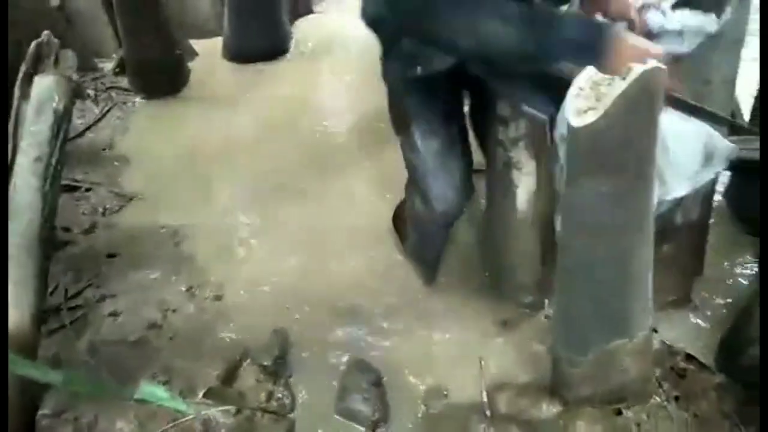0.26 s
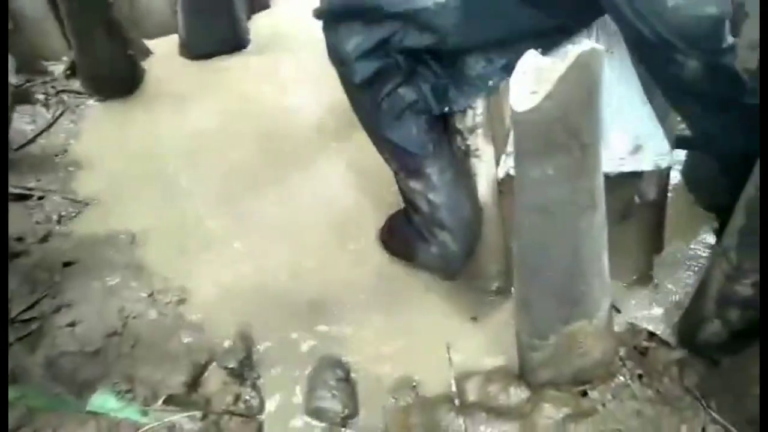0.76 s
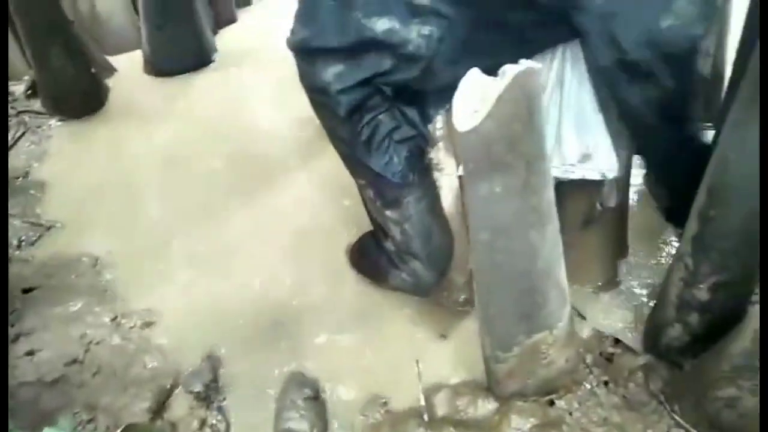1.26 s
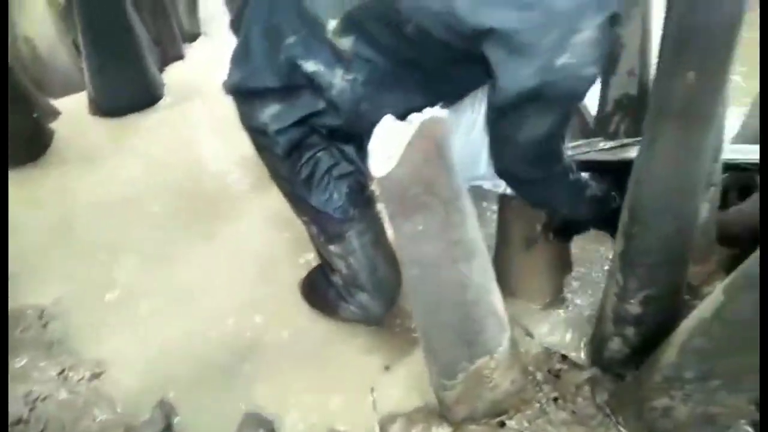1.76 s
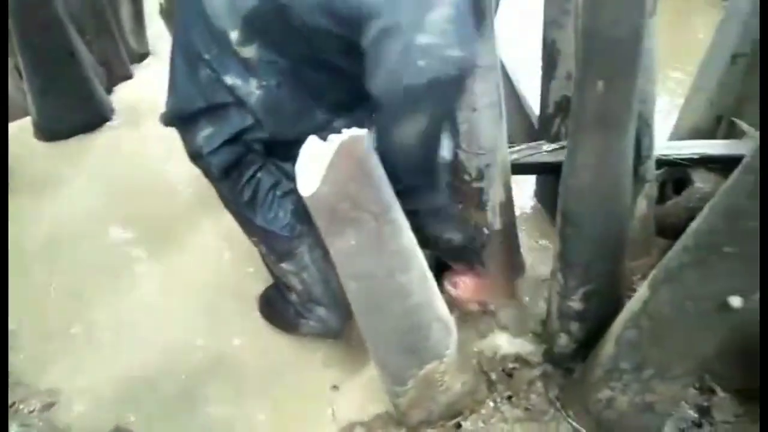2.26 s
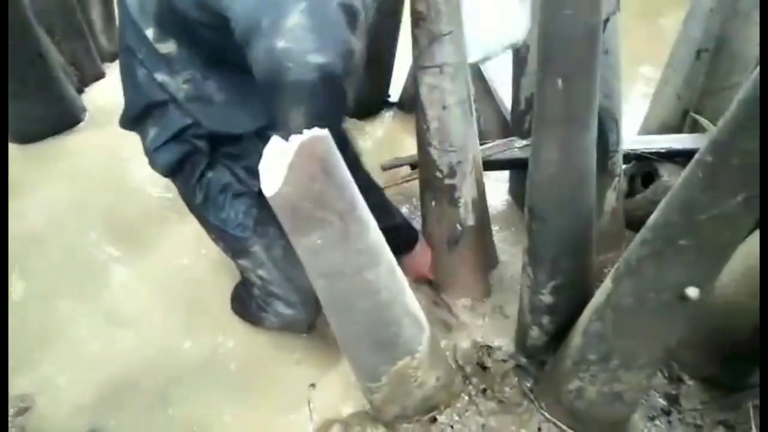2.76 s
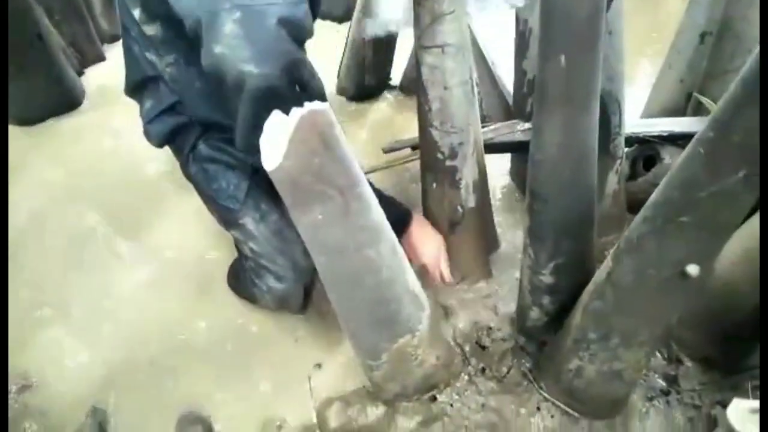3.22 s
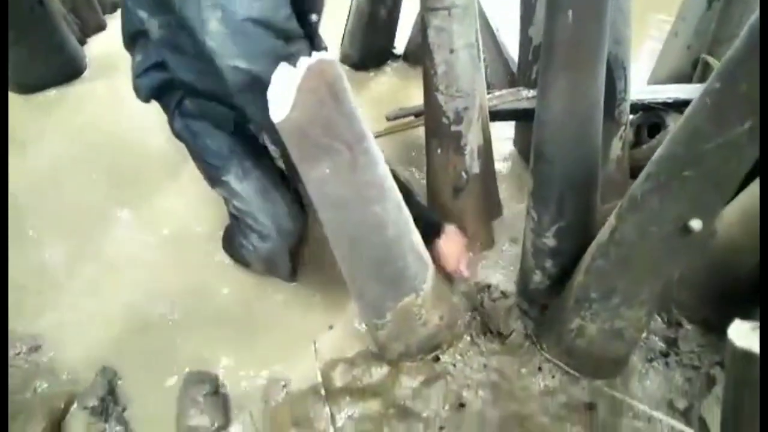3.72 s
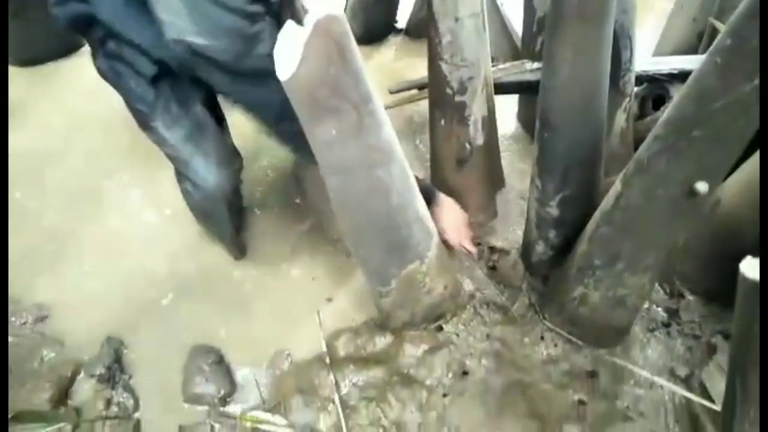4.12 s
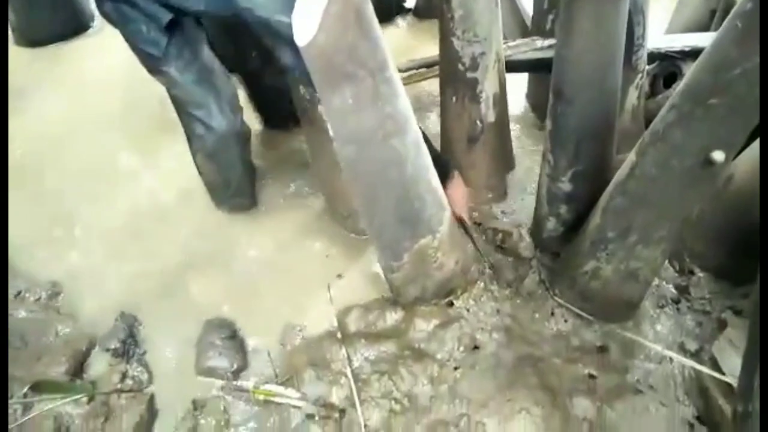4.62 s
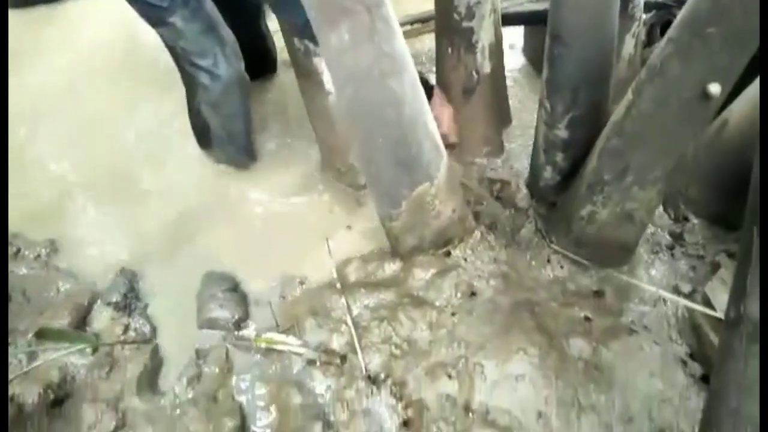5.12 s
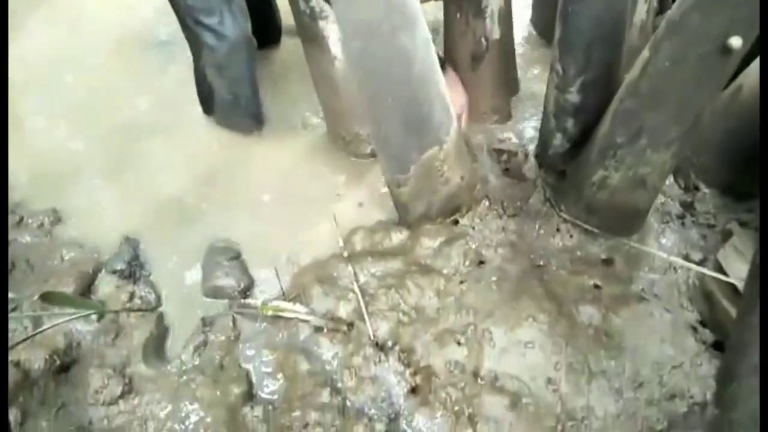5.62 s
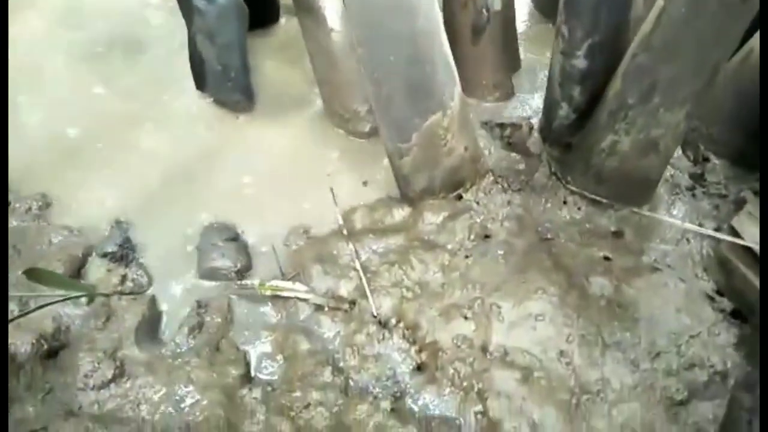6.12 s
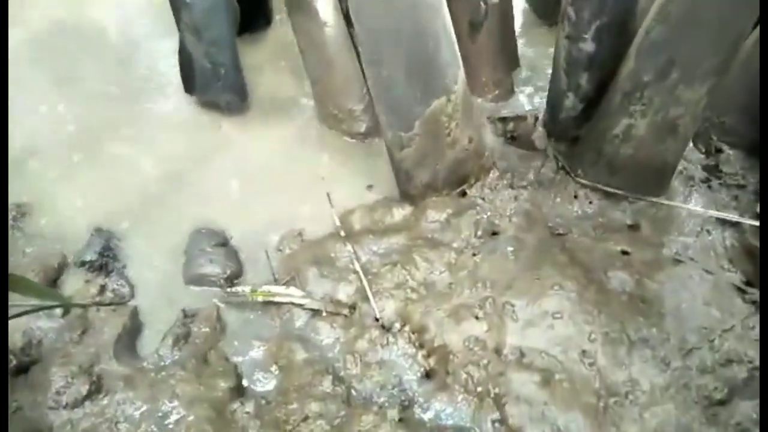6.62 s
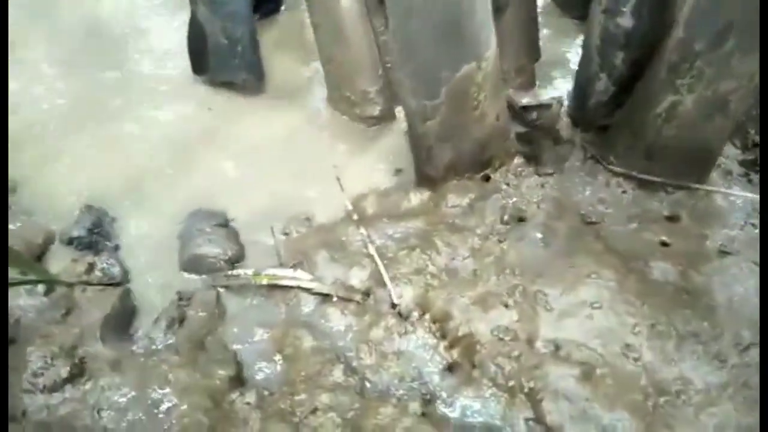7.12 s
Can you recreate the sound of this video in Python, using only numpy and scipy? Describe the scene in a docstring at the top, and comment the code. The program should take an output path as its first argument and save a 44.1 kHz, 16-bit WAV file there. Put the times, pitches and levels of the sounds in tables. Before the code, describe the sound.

Hands and boots stir shallow muddy water between wooden stumps, with bubbly plops, squelches and slaps growing stronger over a faint distant engine.

```python
"""Mud work among the stumps

Hands and boots stir shallow muddy water between wooden stumps, a few steps from a small camera's microphone.
Each move drives swarms of ringing bubbles, mud and spray; air pockets plop and gurgle as sliding sines,
drops smack and lumps of mud slap down as rings and noise bursts, and the stumps echo these single events.
Behind lie an engine that speeds up, open-air noise and a faint whine; a noise suppressor turns quiet bands down.
"""
import sys
import numpy as np
from scipy import signal
from scipy.fft import rfft, irfft
from scipy.io import wavfile
from scipy.ndimage import uniform_filter1d, minimum_filter1d

SR = 44100
rng = np.random.default_rng(int(sys.argv[2]) if len(sys.argv) > 2 else 0)


def int16_out(signal):
    """Quantize to a 16-bit WAV file."""
    q = np.round(np.clip(np.atleast_2d(signal).T, -1, 1) * 32767)
    wavfile.write(sys.argv[1], SR, q.astype(np.int16))


N = 325318  # samples

# Relative colour of the fizzing bubbles, the thick mud and the fine spray: pitch_hz, level_db (per Hz)
BUBBLES = [(400, -83), (700, -6.5), (1370, -1), (1650, 3.5), (2150, 3), (3300, -6.5), (4600, -69)]
MUD = [(88, -49), (150, -16), (360, 0.5), (991, 4.5), (1300, -5), (1690, -49)]
SPRAY = [(2500, -46), (2850, -2.5), (4050, 6), (6260, -14), (9470, -19.5), (13000, -14)]


def stirred_water():
    """Bubbles of three size ranges ring at random, their strength following the stirring."""
    fizz = swarm(BUBBLES, cycles=56, per_s=600, spread_db=3.3, haze_db=0, count=22)
    mud = swarm(MUD, cycles=28, per_s=220, spread_db=3.5, haze_db=-1, count=12)
    spray = swarm(SPRAY, cycles=30, per_s=1400, spread_db=3.4, haze_db=4, count=16)
    layers = [clumped(fizz, 3.0), clumped(mud, 3.4), clumped(spray, 2.2)]
    # all sizes surge together
    sloshing = gain_of(2.47 * evened(uniform_filter1d(rng.standard_normal(N), size=600)))
    return sloshing * (stirring() * layers).sum(0)


# Each move of a boot, hand or blade through the water:
# start_s, swell_s, length_s, bubbles_db, mud_db, spray_db
SPLASHES = [(0.149, 0.028, 0.18, -44, -43.5, -44), (0.385, 0.0033, 0.13, -43, -37.5, -46.5),
            (0.885, 0.044, 0.29, -41.5, -53.5, -42), (1.247, 0.043, 0.35, -37, -50, -42.5),
            (1.664, 0.0039, 0.068, -40, -76, -47), (1.956, 0.0034, 0.17, -61, -44, -67),
            (2.046, 0.048, 0.11, -42, -75, -46), (2.252, 0.12, 1, -33.5, -59, -36),
            (2.409, 0.0048, 0.1, -41.5, -39.5, -40.5), (2.68, 0.079, 0.42, -38, -36.5, -39.5),
            (3.153, 0.013, 0.022, -31, -39.5, -41.5), (3.499, 0.055, 0.15, -29.5, -56, -34.5),
            (3.875, 0.027, 0.16, -30.5, -46, -39), (4.348, 0.089, 0.11, -26, -34.5, -34.5),
            (4.548, 0.14, 0.52, -37.5, -86, -43.5), (4.761, 0.061, 0.13, -31.5, -33.5, -37.5),
            (5.105, 0.63, 0.21, -24.5, -28.5, -31.5), (5.466, 0.0095, 0.21, -30.5, -32, -40.5),
            (5.779, 0.011, 0.24, -42.5, -39, -40.5), (5.862, 0.017, 0.19, -41.5, -36, -60),
            (6.18, 0.0056, 0.12, -45.5, -34.5, -46), (6.607, 0.0026, 0.12, -39.5, -40, -38.5),
            (6.677, 0.01, 0.17, -35, -32, -44.5), (6.977, 0.033, 0.23, -43.5, -44.5, -62)]
# One row each for bubbles, mud and spray.
# Fall while a move lasts: fall_db_per_s
SAG_DB_PER_S = [(22.5,), (31.5,), (29.5,)]
# Fall after the move ends: fall_db_per_s
SETTLE_DB_PER_S = [(125,), (192,), (72,)]
# Lapping between the moves: level_db
CALM_DB = [(-62,), (-60,), (-56,)]
ATTACK_S, SWELL_DB = 0.0043, 13.5  # fast onset; the swell begins this far down


def stirring():
    """Strength of bubbles, mud and spray: each move sets in fast, swells, sags, and settles when it ends."""
    t = np.arange(N) / SR
    power = gain_of(CALM_DB) ** 2 * np.ones(N)
    for start_s, swell_s, length_s, *levels_db in SPLASHES:
        age = t[round(start_s * SR):][:SR] - start_s  # each move is followed for one second
        fall_db = SAG_DB_PER_S * np.minimum(age, length_s)
        fall_db += SETTLE_DB_PER_S * np.maximum(age - length_s, 0)
        fall_db += SWELL_DB * np.maximum(1 - age / max(swell_s, .002), 0)
        shape = np.clip(age / ATTACK_S, 0, 1) * gain_of(np.array(levels_db)[:, None] - fall_db)
        for layer, part in zip(power, shape):
            add(layer, start_s, part ** 2)
    return np.sqrt(power)


def swarm(spectrum, cycles, per_s, spread_db, haze_db, count):
    """Bubbles of many sizes at random moments, a few loud, over a noise haze of countless faint ones."""
    out = np.zeros(N)
    for hz in np.geomspace(spectrum[1][0], spectrum[-2][0], count):
        loudness = gain_of(spread_db * np.minimum(rng.exponential(1, N), 4))
        hits = loudness * (rng.random(N) < per_s / count / SR)
        ring = bubble(hz, cycles / hz, 0.294, 1 / hz)
        rings = signal.oaconvolve(hits, ring / np.linalg.norm(ring))[:N]
        out += gain_of(read(spectrum, hz)) * np.sqrt(hz) * rings
    haze = evened(coloured(rng.standard_normal(N), spectrum))
    return evened(evened(out) + gain_of(haze_db) * haze)


# Air pockets that close and ring: start_s, level_db, pitch_hz
PLOPS = [(0.2, -37, 700), (0.276, -35.5, 744), (0.397, -22.5, 747), (0.512, -33.5, 2020),
         (0.666, -37.5, 1610), (0.908, -30.5, 1250), (0.984, -27, 1037), (1.259, -25, 1920),
         (1.361, -23, 1630), (1.539, -29, 1620), (1.674, -23.5, 1470), (1.707, -25.5, 1390),
         (1.887, -28.5, 1890), (1.964, -29.5, 396), (2.05, -31.5, 380), (2.17, -29.5, 1420),
         (2.355, -26.5, 1800), (2.425, -29, 1068), (2.752, -16, 966), (2.755, -19, 1820), (2.905, -33, 377),
         (3.09, -21, 1734), (3.169, -24, 1800), (3.204, -14.5, 4200), (3.208, -19.5, 2460),
         (3.358, -27, 4050), (3.536, -13.5, 1660), (3.612, -16, 1840), (3.642, -15, 4270),
         (3.896, -23, 1550), (3.91, -17, 3940), (3.921, -15.5, 2110), (3.934, -23, 1345),
         (4.055, -21.5, 2050), (4.356, -20.5, 1680), (4.39, -9, 1520), (4.573, -23.5, 1590),
         (4.659, -26, 1630), (4.701, -34.5, 780), (4.832, -15, 2175), (4.861, -17.5, 1620),
         (4.955, -24.5, 2900), (5.143, -25.5, 786), (5.159, -14, 2174), (5.227, -20, 1220),
         (5.245, -20.5, 690), (5.268, -22, 648), (5.286, -23.5, 2020), (5.426, -30, 401),
         (5.502, -15, 1156), (5.507, -13, 2216), (5.509, -17.5, 3870), (5.553, -21, 1086),
         (5.579, -21, 800), (5.64, -27.5, 516), (5.698, -37, 3560), (5.891, -15.5, 1990),
         (5.953, -29, 2840), (6.046, -26.5, 1810), (6.169, -32.5, 1770), (6.187, -26, 790),
         (6.25, -34, 1130), (6.301, -27, 958), (6.449, -41, 930), (6.493, -35.5, 1320),
         (6.508, -42.5, 3000), (6.569, -33, 3030), (6.614, -31, 456), (6.685, -13.5, 3700),
         (6.687, -18, 1820), (6.774, -22, 1145), (6.998, -17, 3130), (7.021, -23.5, 4480),
         (7.031, -20, 1890), (7.033, -25.5, 1140), (7.079, -31.5, 800), (7.11, -23, 684),
         (7.275, -35.5, 3200), (7.359, -33.5, 3160)]


def plops():
    """A pocket closes with a wide crack and rings, a weaker neighbour beating against it, amid a burst of fizz."""
    ring, fizz, crack = np.zeros((3, N))
    t = np.arange(6000) / SR
    chance = rng.random((len(PLOPS), 2))
    for (start_s, level_db, hz), (late, apart) in zip(PLOPS, chance):
        t60 = 0.016 * (1500 / hz) ** 0.87  # large pockets ring longer
        add(ring, start_s, gain_of(level_db) * bubble(hz, t60, 0.04, 0.00046))
        neighbour = bubble(hz * (.8 + .45 * apart), t60, .08, .0012)
        add(ring, start_s + .008 * late, gain_of(level_db - 10) * neighbour)
        add(fizz, start_s, gain_of(level_db - 18.0 - 60 * t / 0.066) * (1 - np.exp(-t / 0.0016)))
        add(crack, start_s, gain_of(level_db - 9 - 60 * t / 0.0094) * (1 - np.exp(-t / 0.00044)))
    fizz_noise, crack_low, crack_high = (evened(coloured(rng.standard_normal(N), table))
                                         for table in (BUBBLES, BUBBLES, SPRAY))
    return ring + fizz * fizz_noise + crack * (crack_low + gain_of(3.0) * crack_high)


# Slow gurgles; a positive glide slides the pitch up, a negative one down:
# start_s, level_db, pitch_hz, t60_s, glide (half the pitch's relative change over one t60)
GURGLES = [(2.843, -28.5, 774, 0.04, 0.54), (6.398, -44, 583, 0.073, -0.17), (7.121, -35, 956, 0.031, 1),
           (7.151, -36.5, 1150, 0.064, 1.5)]


def gurgles():
    """Trapped air escapes slowly and sings with a sliding pitch."""
    out = np.zeros(N)
    for start_s, level_db, hz, t60, glide in GURGLES:
        add(out, start_s, gain_of(level_db) * bubble(hz, t60, glide, 0.003))
    return out


# Large thrown drops that smack the surface: start_s, level_db
DROPS = [(2.025, -36.5), (2.737, -30), (3.192, -31), (3.603, -32), (3.643, -28), (3.921, -22), (4.767, -36),
         (6.278, -35.5), (6.748, -34)]
# Relative colour of a smack: pitch_hz, level_db (per Hz)
SMACK = [(1500, -10), (4000, 9), (7000, -5), (12500, -6)]


def drops():
    """Bright noise bursts: the large drops, and a random patter of small ones as strong as the spray."""
    t = np.arange(3000) / SR
    sizes = gain_of(-10.5 + 1.2 * np.minimum(rng.exponential(1, N), 4))
    hits = stirring()[2] * sizes * (rng.random(N) < 40 / SR)  # 40 small drops a second on average
    for start_s, level_db in DROPS:
        add(hits, start_s, gain_of([level_db]))
    burst = gain_of(-60 * t / 0.041) * (1 - np.exp(-t / 0.00027))
    shape = signal.oaconvolve(hits, burst)[:N]
    return shape * evened(coloured(rng.standard_normal(N), SMACK))


# Lumps of mud slapping down, level before mixing: start_s, level_db, pitch_hz, t60_s
SLAPS = [(0.398, -20.5, 231, 0.045), (1.391, -42, 337, 0.27), (2.024, -30.5, 175, 0.017),
         (2.772, -25, 232, 0.033), (3.664, -16, 381, 0.045), (4.766, -34, 132, 0.09),
         (5.784, -31.5, 517, 0.076), (6.029, -32, 358, 0.056), (6.747, -29, 359, 0.068)]
# A lump's hollow rings at several pitches: pitch_multiple, level_db (relative)
LUMP = [(.5, -1), (1, 4.5), (1.17, 1.5), (1.44, -2.5), (1.75, -21)]


def slaps():
    """A lump lands: a dull, rough thud of several low rings and a short wet puff."""
    ring, puff = np.zeros((2, N))
    t = np.arange(8000) / SR
    detunes = rng.uniform(.96, 1.04, (len(SLAPS), len(LUMP)))
    for (start_s, level_db, hz, t60), off in zip(SLAPS, detunes):
        for (multiple, ring_db), detune in zip(LUMP, off):
            thud = bubble(hz * multiple * detune, t60, 0.0096, 0.00041)
            add(ring, start_s, gain_of(level_db + ring_db) * thud / 2)
        puff_db = level_db - 6.5 - 60 * t / (1.13 * t60)
        add(puff, start_s, gain_of(puff_db) * (1 - np.exp(-t / 0.00037)))
    out = ring + puff * evened(coloured(rng.standard_normal(N), MUD))
    # small lumps move little deep air
    return signal.sosfilt(signal.butter(2, 130, "high", fs=SR, output="sos"), out)


def stumps(x):
    """Short echoes off the stumps and the bank: sparse taps that die fast."""
    at = np.arange(60, 8000, 20) + rng.integers(0, 20, 397)
    taps = np.zeros(8100)
    taps[at] = rng.choice([-1., 1.], len(at)) * gain_of(-60 * at / SR / 0.072)
    return signal.oaconvolve(x, taps / np.linalg.norm(taps))[:N]


# Far engine: time_s, firing_pitch_hz, level_db
ENGINE = [(0.399, 76.2, -67), (1.9, 88.9, -56), (2.299, 100.1, -55.5), (3, 102.9, -46), (4.603, 111.1, -55),
          (6.2, 122.2, -58)]
# Its orders: pitch_multiple, level_db (relative)
ENGINE_ORDERS = [(1, 1), (1.5, -7.5)]


def engine():
    """Low orders of a far engine as sines that follow its speed, each wavering in the open air."""
    time_s, hz, level_db = np.transpose(ENGINE)
    t = np.arange(N) / SR
    turns = np.cumsum(np.interp(t, time_s, hz)) / SR
    wavers = uniform_filter1d(rng.standard_normal((len(ENGINE_ORDERS), N)), 2500, 1)
    drone = np.zeros(N)
    for (multiple, order_db), waver in zip(ENGINE_ORDERS, wavers):
        drone += gain_of(order_db + 2.4 * evened(waver)) * np.sin(2 * np.pi * multiple * turns)
    return np.sqrt(2) * gain_of(np.interp(t, time_s, level_db)) * drone


# The open air swells slowly: time_s, level_db
AIR_SWELL = [(0, -57), (2, -48), (7.38, -50)]
# Relative colour of its rumble and hiss: pitch_hz, level_db (per Hz)
AIR = [(18, -49), (36, -12), (97, -3.5), (274, -33.5), (903, -44.5), (2560, -27), (4040, -24),
       (6720, -47.5), (13000, -41)]


def open_air():
    """Distant rumble and hiss as coloured noise, drifting in patches above the bass."""
    air = clumped(coloured(rng.standard_normal(N), AIR), 4.96)
    return level_over_time(AIR_SWELL) * air


# A far whine comes and goes: time_s, level_db
WHINE = [(0.798, -80), (4, -88), (6, -72.5)]


def insects():
    """A faint, narrow band of noise whines far off, probably insects."""
    band = signal.butter(2, [8420, 8600], "band", fs=SR, output="sos")
    return level_over_time(WHINE) * evened(signal.sosfilt(band, rng.standard_normal(N)))


def bubble(hz, t60, glide, rise_s):
    """A pocket of air rings as a decaying sine whose pitch slides: up for a positive glide."""
    t = np.arange(int((1.2 * t60 + 4 * rise_s) * SR) + 8) / SR
    shape = (1 - np.exp(-t / rise_s)) ** 2 * gain_of(-60 * t / t60)
    return shape / shape.max() * np.sin(2 * np.pi * hz * (t + glide * t ** 2 / t60))


def clumped(x, depth_db):
    """Patches a few hundred hertz wide and about a tenth of a second long swell and sink above the bass."""
    hz, _, z = signal.stft(x, SR, nperseg=512, noverlap=384)
    patches = uniform_filter1d(rng.standard_normal(z.shape), 4, 0)
    patches = evened(uniform_filter1d(patches, 30, 1))
    z = z * gain_of(depth_db * patches * (hz > 200)[:, None])
    return evened(signal.istft(z, SR, nperseg=512, noverlap=384)[1][:N])


def coloured(x, spectrum):
    """Gives x the colour of a spectrum table."""
    gain = gain_of(read(spectrum, np.fft.rfftfreq(len(x), 1 / SR)))
    return irfft(rfft(x) * gain, len(x))


def read(points, hz):
    """Reads a spectrum table between its points, along log pitch."""
    f, value = np.transpose(points)
    return np.interp(np.log(hz + 1), np.log(f + 1), value)


def level_over_time(points):
    """Gain that follows a table of times and levels."""
    time_s, level_db = np.transpose(points)
    return gain_of(np.interp(np.arange(N) / SR, time_s, level_db))


def gain_of(db):
    """Amplitude factor of a level in dB."""
    return 10 ** (np.asarray(db) / 20)


def evened(x):
    """Scales x to an RMS of one."""
    return x / np.sqrt(np.mean(x ** 2) + 1e-20)


def add(mix, start_s, sound):
    """Lays a sound into the mix at its start, cut at the end."""
    part = mix[round(start_s * SR):][:len(sound)]
    part += sound[:len(part)]


def scene():
    """Single water events and their echoes, over the stirred water and the far background."""
    events = plops() + gurgles() + drops() + slaps()
    echoes = gain_of(1.5) * stumps(events)
    return (events + echoes + stirred_water() + engine() + open_air() + insects())[None]


def suppressed(x, over_db, depth_db, hold):
    """A band opens when it rises above its usual quiet level and is turned down after a hold (in frames)."""
    hz, _, z = signal.stft(x, SR, nperseg=512, noverlap=384)
    band_power = uniform_filter1d(uniform_filter1d(abs(z) ** 2, 5, 0), 5, 1)
    band_db = 10 * np.log10(abs(band_power) + 1e-16)
    rise_db = band_db - np.percentile(band_db, 15, axis=1, keepdims=True)
    opened = np.clip((rise_db - over_db) / 3, 0, 1)
    held = -minimum_filter1d(-opened, size=hold, axis=1, origin=(hold - 1) // 2)
    cut_db = depth_db * (1 - uniform_filter1d(held, 3, 1)) * (hz > 200)[:, None]  # bass stays open
    return signal.istft(z * gain_of(-cut_db), SR, nperseg=512, noverlap=384)[1][:N]


def record(dry):
    """The camera's noise suppressor, then its upper band limit."""
    clean = suppressed(dry[0], over_db=7.0, depth_db=7.0, hold=21)[None]
    low_pass = signal.firwin(401, 13150, window=("kaiser", 9), fs=SR)  # edge in Hz
    return signal.oaconvolve(clean, low_pass[None], "same")


dry = scene()
out = record(dry)
int16_out(out)
```